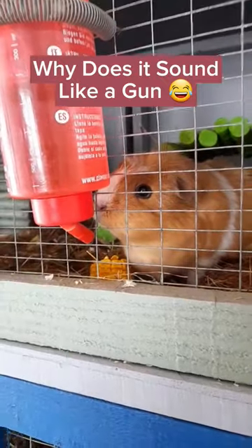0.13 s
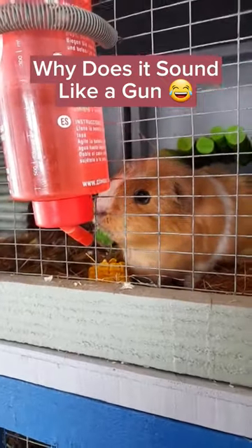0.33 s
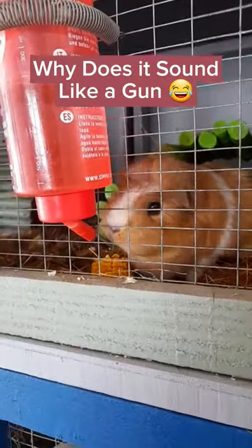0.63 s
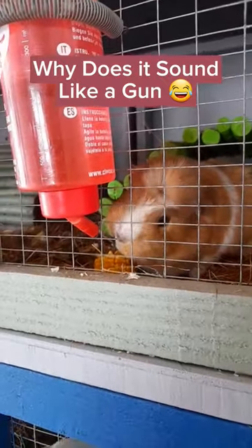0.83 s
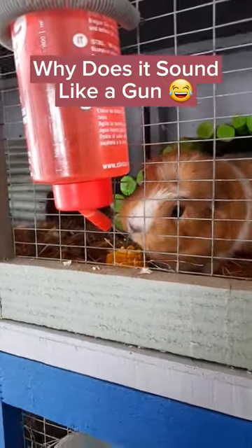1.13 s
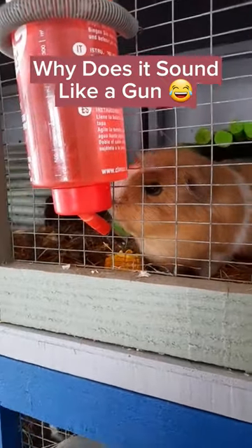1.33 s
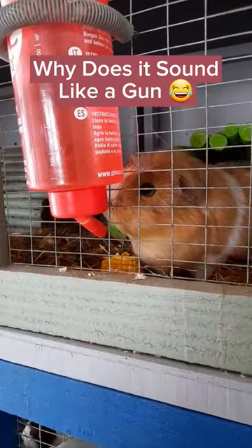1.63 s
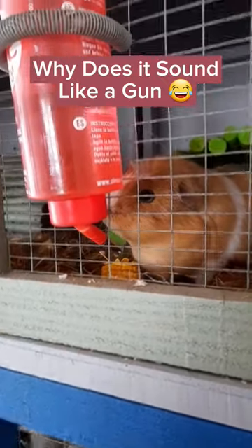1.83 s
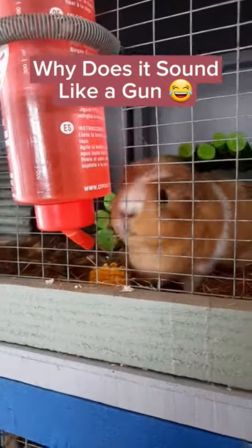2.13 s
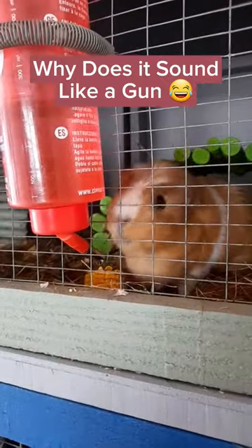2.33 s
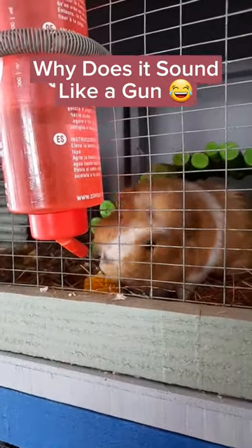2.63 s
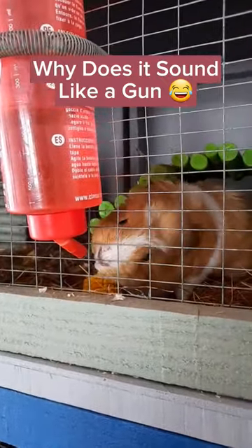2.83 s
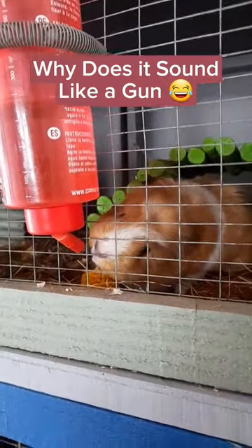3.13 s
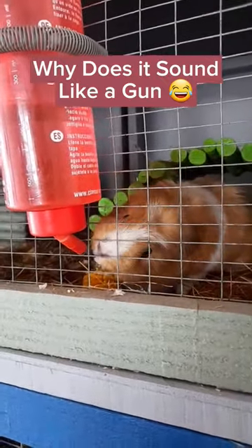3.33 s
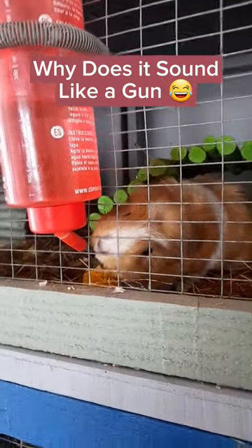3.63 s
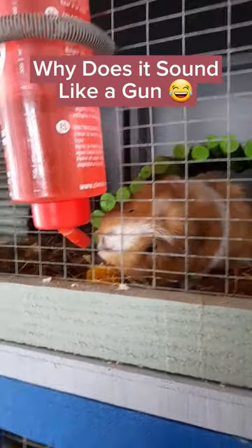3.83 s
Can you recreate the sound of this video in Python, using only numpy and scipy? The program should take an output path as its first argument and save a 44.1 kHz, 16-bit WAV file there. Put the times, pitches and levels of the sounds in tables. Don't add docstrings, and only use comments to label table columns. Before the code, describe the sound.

Metal water bottle spout rattles in sharp, rapid clicks as a guinea pig drinks, after quiet room noise.

```python
import sys
import numpy as np
from scipy import signal
from scipy.fft import rfft, irfft, next_fast_len
from scipy.io import wavfile
from scipy.ndimage import uniform_filter1d

SR = 44100
rng = np.random.default_rng(int(sys.argv[2]) if len(sys.argv) > 2 else 0)


def field_ratio(decibels):
    return 10 ** (np.asarray(decibels, dtype=float) / 20)


def file_out(sig):
    cols = np.atleast_2d(sig).T
    lim = np.clip(cols, -1, 1)
    pcm = np.round(lim * 32767).astype(np.int16)
    wavfile.write(sys.argv[1], SR, pcm)


N = 176400
PAD = next_fast_len(N + 4096)
BIN_HZ = np.fft.rfftfreq(PAD, 1 / SR)
SIDES = np.array([[.5], [-.5]])


def shaped(x, gain):
    return irfft(rfft(x, PAD) * gain, PAD)[..., :N]


def along(table):
    t = np.array(table, float)
    return np.interp(np.log(BIN_HZ + 1), np.log(t[:, 0]), t[:, 1])


def colour(x, table):
    gain = field_ratio(along(table))
    return shaped(x, gain / np.sqrt(np.mean(gain ** 2)))


def filtered(x, order, hz, kind):
    return signal.sosfilt(signal.butter(order, hz, kind, fs=SR, output="sos"), x)


def band(hz, width):
    y = shaped(rng.standard_normal(N), 1 / (1 + (2 * (BIN_HZ - hz) / width) ** 2))
    return y / y.std()


def walk(rate):
    k = int(SR / rate)
    steps = np.repeat(rng.standard_normal(N // k + 1), k)
    return 1.3 * uniform_filter1d(uniform_filter1d(steps, k), k)[:N]


def swell(start, rise, hold, t60):
    t = np.arange(N) / SR - start
    return np.clip(t / rise, 0, 1) ** 2 * field_ratio(-60 * np.clip(t - rise - hold, 0, 1) / t60)


def puffs(rows):
    t, out = np.arange(N) / SR, 0
    for s, db, hz, width, length in rows:
        out = out + field_ratio(db) * band(hz, width) * np.exp(-(2 * (t - s) / length) ** 2)
    return out


# f/Hz, level/dB per Hz
HISS = [(59, -12.5), (100, 1.5), (608, -12), (970, -11.5), (1950, -20.5), (6700, -22), (7610, -20.5),
        (13800, -20), (16000, -19)]
# f/Hz, side over mid/dB
HISS_SIDE = [(60, -0.17), (300, -2.7), (1500, 0.5)]
# f/Hz, left over right/dB
HISS_PAN = [(60, -7), (1300, -2.5), (4400, -1.7), (12000, 1)]


def room_tone():
    mid, side = (colour(rng.standard_normal(N), HISS) * field_ratio(-60) for _ in range(2))
    side = shaped(side, field_ratio(along(HISS_SIDE)))
    pan = along(HISS_PAN) / 2
    hiss = shaped(np.array([mid + side, mid - side]), field_ratio(np.array([pan, -pan])))
    low, lower = (signal.sosfiltfilt(signal.butter(2, hz, fs=SR, output="sos"), hiss) for hz in (2000, 700))
    breathing = lower * field_ratio(1.5 * walk(11.5))
    breathing = breathing + (low - lower) * field_ratio(2.33 * walk(15.71))
    breathing = breathing + (hiss - low) * field_ratio(.5 * walk(6.68))
    rumble = band(52, 29) * field_ratio(-61 - 3 * walk(8.14))
    return breathing + rumble * field_ratio(-3.0 * SIDES)


# t/s, level/dB, f/Hz, length/s
BUMPS = [(0.478, -52, 180, 0.11), (0.534, -49.5, 60.6, 0.1), (0.582, -50, 60, 0.033),
         (1.251, -45.5, 52, 0.027), (2.895, -49.5, 49.7, 0.34), (3.048, -27.5, 97, 0.014),
         (3.115, -35.5, 83, 0.089), (3.256, -42, 104, 0.094), (3.344, -44, 58.6, 0.14),
         (3.566, -47.5, 55.4, 0.075), (3.812, -41, 54.5, 0.049), (3.907, -44.5, 108, 0.044),
         (3.975, -45, 80, 0.095)]


def hand_bumps():
    return puffs([(s, db, hz, .9 * hz, length) for s, db, hz, length in BUMPS])


# t/s, level/dB, f/Hz, width/Hz, length/s
RUSTLES = [(0.031, -54, 9900, 1200, 0.0095), (.32, -67, 1740, 190, 0.044), (1.21, -61.5, 1674, 120, 0.021),
           (1.42, -60, 8900, 14810, 0.09), (1.62, -62.5, 925, 138.9, 0.034), (2.03, -64, 1389, 1667, 0.039),
           (0.254, -58, 840, 92.59, 0.033), (.83, -64.5, 1660, 200, 0.031), (1.95, -63, 1720, 200, 0.031),
           (1.76, -65, 1410, 200, 0.028), (2.45, -68, 1950, 200, 0.055), (.55, -67.5, 1070, 500, 0.23),
           (.9, -70.5, 960, 300, 0.1), (1.99, -65, 960, 250, 0.071), (2.76, -62, 1310, 150, 0.024),
           (3.875, -48.5, 1360, 150, 0.046)]


def rustles():
    return puffs(RUSTLES)


# t/s, level/dB, f/Hz
PAWS = [(0.23, -55, 1030), (0.508, -53.5, 457), (0.667, -55, 980), (0.798, -68, 383), (1.411, -58, 475),
        (1.729, -56.5, 484), (1.909, -59.5, 450), (2.171, -53, 1054), (2.422, -48.5, 443),
        (2.513, -57, 1270), (2.604, -52, 428), (2.69, -48, 487), (2.749, -74, 1370)]


def paws():
    rise_s, t60_s, level_db, pan_db = 0.025, 0.18, -7.5, -9
    thud, out = field_ratio(-0.5) * band(430, 1340), 0
    for s, db, hz in PAWS:
        knock = (band(hz, 0.078 * hz) + thud) * swell(s - rise_s, rise_s, 0.0061, t60_s)
        out = out + field_ratio(db + level_db + pan_db * SIDES) * knock
    return out


def snaps(rows):
    out, t = np.zeros(N + SR), np.arange(SR // 20) / SR
    for s, db, hz, t60 in rows:
        start = int(s * SR)
        tone = field_ratio(db - 60 * t / t60) * np.sin(2 * np.pi * hz * t)
        out[start:start + len(t)] += 2 * np.minimum(t / .0003, 1) * tone
    return out[:N]


# t/s, level/dB, f/Hz, t60/s
CLACKS = [(2.896, -28.5, 3780, 0.018), (2.912, -32, 3200, .03), (3.0732, -10.5, 3860, 0.002),
          (3.0742, -21, 3240, 0.002), (3.118, -30, 3200, 0.013), (3.1792, -23, 2150, 0.0037),
          (3.1988, -17, 6750, 0.0023), (3.2095, -37, 6200, 0.012), (3.3526, -9.5, 3870, 0.0042),
          (3.3536, -28, 3930, 0.0025), (3.3571, -13.5, 4320, 0.0074), (3.3605, -22, 3500, 0.0093),
          (3.433, -32, 3400, 0.024), (3.467, -42, 6320, 0.023), (3.6243, -11, 3750, 0.0045),
          (3.6255, -12, 4400, 0.0093), (3.6286, -17, 3580, 0.0055), (3.6297, -23, 4000, 0.0053),
          (3.647, -17, 4450, 0.0039), (3.65, -27, 3060, 0.013), (3.7112, -28, 1860, 0.0091),
          (3.7265, -29.5, 6280, 0.0086), (3.948, -19, 4270, 0.0078), (3.956, -27, 1870, .008),
          (3.978, -43, 6300, 0.021)]


def wall_clacks():
    return snaps(CLACKS)


# t/s, level/dB
TICKS = [(2.8955, -22), (2.9006, -29), (2.9053, -28), (2.9154, -33), (3.0784, -17), (3.09, -26),
         (3.1144, -22), (3.1786, -14), (3.1865, -32), (3.1981, -11.5), (3.2076, -20), (3.3573, -18),
         (3.366, -32), (3.3937, -28), (3.4374, -18), (3.4419, -19), (3.4479, -19), (3.463, -34),
         (3.6282, -20.5), (3.6342, -27), (3.646, -15), (3.655, -30), (3.7013, -23), (3.7088, -15),
         (3.7265, -25), (3.8965, -21), (3.9483, -25), (3.957, -25), (3.9764, -27)]
# f/Hz, level/dB, t60/s
RIM = [(10700, -22, 0.0017), (12340, -4, 0.0016), (13150, 1.5, 0.0026), (14300, -14, 0.0018)]


def rim_ticks():
    return snaps([(s, db + mode_db, hz, t60) for s, db in TICKS for hz, mode_db, t60 in RIM])


def ring(x, hz, t60):
    r, w = np.exp(-np.log(1000) / (max(t60, .001) * SR)), 2 * np.pi * hz / SR
    return signal.lfilter([np.sin(w)], [1, -2 * r * np.cos(w), r * r], x)


def grains(apart=1.0):
    per_s, spread_db = 4500, 4.5
    hits = rng.random((3, N)) < per_s / SR
    sizes = field_ratio(spread_db * rng.standard_normal((3, N))) * rng.standard_normal((3, N))
    g = hits * sizes
    g = g[0] + apart * g[1:]
    return g / g.std()


def knocks(times, dbs, modes):
    spread_db, pitch_spread, snap_s = 3.5, .022, .0017
    out, t = np.zeros(N + SR), np.arange(SR // 8) / SR
    hz, mode_db, t60 = np.array(modes).T[:, :, None]
    for s, db, luck in zip(times, dbs, rng.standard_normal((len(times), 2, len(modes), 1))):
        level = field_ratio(db + mode_db + spread_db * luck[0] - 60 * t / t60)
        tone = level * np.sin(2 * np.pi * hz * (1 + pitch_spread * luck[1]) * t)
        start = int(s * SR)
        out[start:start + len(t)] += (.6 + np.exp(-(t / snap_s) ** 2)) * tone.sum(0) / 4
    return filtered(out[:N], 3, 560, "high")


def scraped(roll, modes, damping, apart):
    power = sum(field_ratio(2 * db) * damping * t60 * SR / (4 * np.log(1000)) for _, db, t60 in modes)
    grit = grains(apart) * roll / np.sqrt(power)
    return sum(field_ratio(db + 3.5 * walk(25.04)) * ring(grit, hz, damping * t60) for hz, db, t60 in modes)


# f/Hz, level/dB per Hz
CRACK = [(120, -39), (200, -43), (821, -13), (2470, 4), (2960, -2.5), (3690, 4), (6170, -7), (13100, -9),
         (16000, -36)]


def crack(times, dbs, roll, side):
    t60_s, level_db = .02, -13
    clicks = np.bincount((times * SR).astype(int), field_ratio(dbs + level_db), N)
    tail = signal.lfilter([1], [1, -field_ratio(-60 / (t60_s * SR))], clicks)
    return filtered(colour((tail + roll) * grains(), CRACK), 2, 8500, side)


# t/s, level/dB, ball ring/dB, cage boom/dB
KNOCKS = [(2.894, -32, 15, -27), (2.9106, -28.5, 19, -28), (2.9159, -31.5, -5, -14),
          (3.0726, -13.5, -23, -30), (3.0783, -19.5, 6.5, -14), (3.1153, -22, 8, -11.5),
          (3.1789, -14.5, -4, -6.5), (3.1867, -25.5, 24, -37), (3.1981, -22.5, 18, -1),
          (3.2077, -47, 8, -17), (3.3526, -12.5, -14, -42), (3.3569, -12.5, -1, -10),
          (3.3941, -15.5, 5, -10), (3.4495, -17.5, 1, -17), (3.6243, -9, -22, -22.5),
          (3.6288, -13.5, -12, -9.5), (3.6462, -12, 6.5, -13), (3.6493, -20, 16, -7),
          (3.7125, -11.5, 0, -13.5), (3.7258, -28.5, -20, 10), (3.8975, -21, 6, -9.5),
          (3.9476, -22, 9, -34), (3.9564, -26, 21, 3), (3.9784, -25.5, -15, 3)]
# t/s, hold/s, level/dB, ball ring/dB, cage boom/dB
ROLLS = [(2.781, 0.053, -56, -6.5, -39), (2.849, 0.076, -54.5, -1, -26), (2.883, 0.023, -39.5, -1.5, -1.5),
         (2.999, 0.028, -51.5, -6.5, -22), (3.052, 0.056, -49, 2.5, -2), (3.163, 0.028, -35.5, -27, -1),
         (3.236, 0.097, -56, -24, 0.5), (3.369, 0.026, -51, -1, 1.5), (3.42, 0.025, -34, -1.5, -5),
         (3.532, 0.01, -47.5, -33, 2.5), (3.626, 0.031, -54.5, 5, -1.5), (3.68, 0.032, -34, -4, -5.5),
         (3.78, 0.0093, -43.5, -26, -3.5), (3.827, 0.041, -56, -13, -9), (3.883, 0.043, -49, -4, -3),
         (3.931, 0.035, -38, -9, -4)]


def played(modes, column=None, rise=0.011, t60=0.091, damping=.14, apart=1.0, crack_side=None):
    k = np.array(KNOCKS)
    times, dbs = k[:, 0], k[:, 1] + (k[:, column] if column else 0)
    roll = sum(field_ratio(r[2] + (r[column] if column else 0)) * swell(r[0], rise, r[1], t60) for r in ROLLS)
    out = knocks(times, dbs, modes) + scraped(roll, modes, damping, apart)
    return out + crack(times, dbs, roll, crack_side) if crack_side else out


# f/Hz, level/dB, t60/s
CAGE = [(336, -18.5, 0.36), (407.4, -12, 0.32), (503, -0.5, 0.19), (731, 1.5, 0.13), (832, 4, 0.1),
        (1279, -3.5, 0.05), (1012, -5.5, 0.15)]


def cage():
    return played(CAGE, -1, rise=0.023, t60=0.15, apart=.5)


# f/Hz, level/dB, t60/s
SPOUT = [(1700, -57, 0.17), (1782, -13, 0.2), (2550, -5, 0.06), (3200, -16.5, 0.26), (3380, -9, 0.075),
         (3900, -39, 0.066), (4380, -31.5, 0.011), (4314, 1, 0.033), (4500, -45, 0.045), (5800, -47, 0.024),
         (7180, -4, 0.0049)]


def spout():
    return played(SPOUT, crack_side="low")


# f/Hz, level/dB, t60/s
BALL = [(11840, -9, 0.029), (12000, -55, 0.07), (13700, -23, 0.034), (13800, -19, 0.018),
        (13900, -36, 0.0095)]


def ball():
    return played(BALL, -2, damping=.07, crack_side="high")


# f/Hz, level/dB
ROOM_COLOUR = [(1000, 1), (4400, -6), (6300, -9.5), (8500, -7), (10000, -9.5), (14500, -13)]
# f/Hz, left over right/dB
PORT_DB = [(100, -2), (700, 1.5), (2500, -2), (5000, 0), (9000, 11), (14000, 9)]


def ports(x):
    lag_s, turns_per_s = -.00033, 5.3
    half = along(PORT_DB) / 2 * np.log(10) / 20 - 1j * np.pi * BIN_HZ * lag_s
    t = np.arange(SR // 2) / SR
    early = rng.standard_normal((2, 2, len(t))) * field_ratio(-60 * t / 0.0089) * (t > .001)
    early = filtered(early, 1, [900, 7000], "band")
    late = colour(rng.standard_normal((2, 2, len(t))), ROOM_COLOUR)[..., :len(t)]
    late = late * field_ratio(-60 * t / 0.51) * (t > .005)
    space = sum(field_ratio(db) * h / np.sqrt(np.sum(h ** 2) / 4) for h, db in ((early, -3.5), (late, -11.5)))
    turn = 2 * np.pi * turns_per_s * np.arange(N) / SR
    paths = x * np.array([np.cos(turn), np.sin(turn)])[:, None]
    wet = signal.fftconvolve(paths, space, axes=2).sum(0)[:, :N]
    return shaped(x + wet, np.exp([half, -half]))


def scene():
    background = room_tone() + (hand_bumps() + rustles()) * field_ratio(-2.5 * SIDES) + paws()
    bottle = cage() + wall_clacks() + rim_ticks() + spout() + ball()
    return background + ports(bottle)


DIP_HZ, DIP_WIDTH_HZ = 8500, 850


def masked(x):
    weak = shaped(x, np.exp(-((BIN_HZ - DIP_HZ) / DIP_WIDTH_HZ) ** 4))
    mids = filtered(x, 2, 1000, "high")
    weak_power, mid_power = (uniform_filter1d(y.sum(0) ** 2, size=900) for y in (weak, mids))
    under_db = 10 * np.log10(weak_power / mid_power + 1e-9)
    return x - weak * np.clip((-24 - under_db) / 2, 0, 1)


def band_limit(x):
    return signal.sosfilt(signal.butter(12, 16480, fs=SR, output="sos"), x)


def record(dry):
    x = shaped(dry, field_ratio(-8 * np.exp(-((BIN_HZ - DIP_HZ) / DIP_WIDTH_HZ) ** 2)))
    x = filtered(x, 6, 38, "high")
    x = signal.sosfilt(signal.ellip(6, .5, 50, 15100, fs=SR, output="sos"), x)
    x = .65 * np.tanh(masked(x) / .65)
    return band_limit(x)


dry = scene()
out = record(dry)
file_out(out)
```